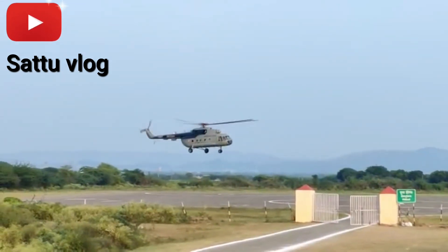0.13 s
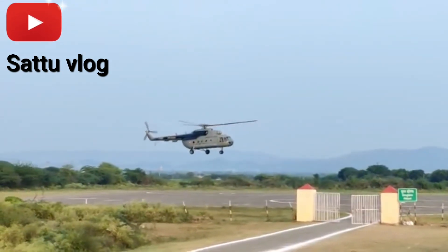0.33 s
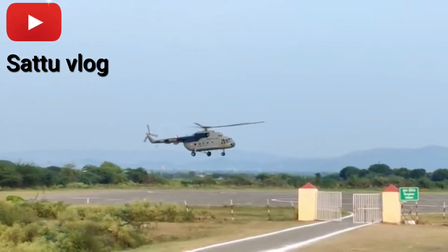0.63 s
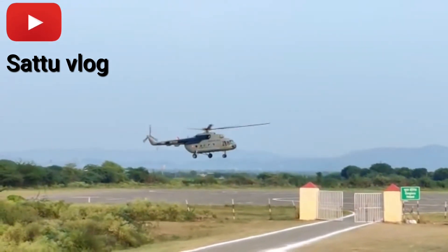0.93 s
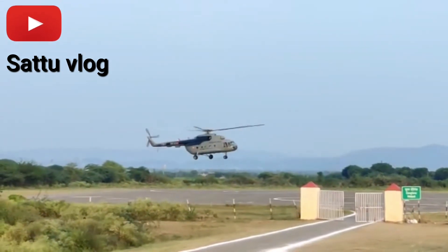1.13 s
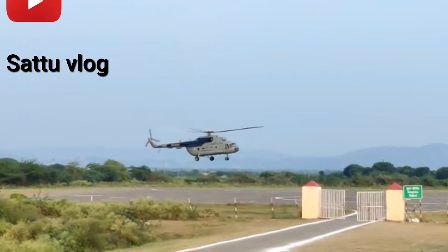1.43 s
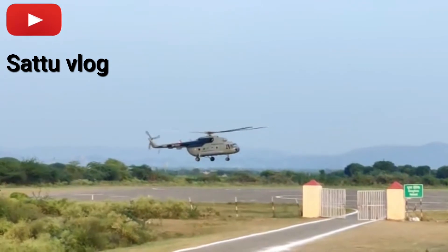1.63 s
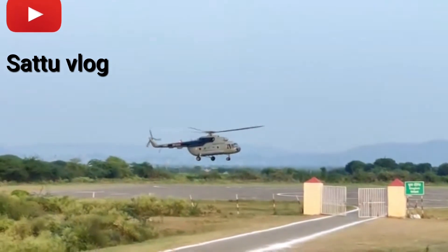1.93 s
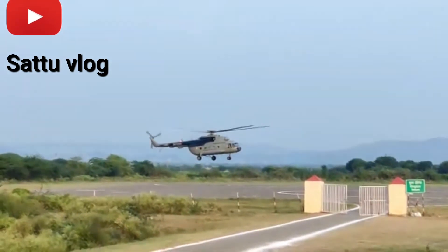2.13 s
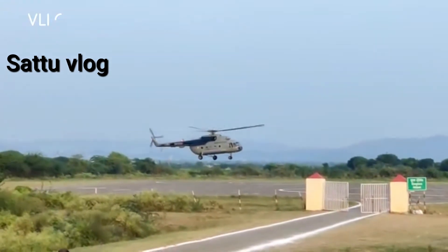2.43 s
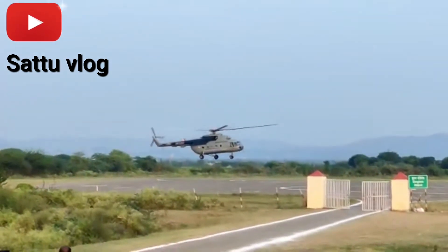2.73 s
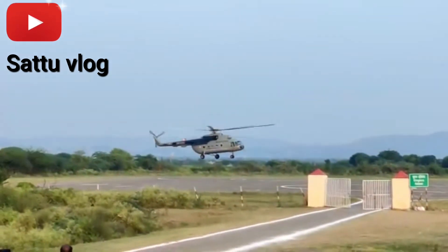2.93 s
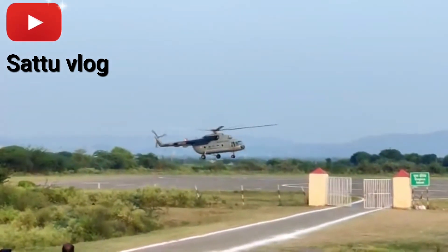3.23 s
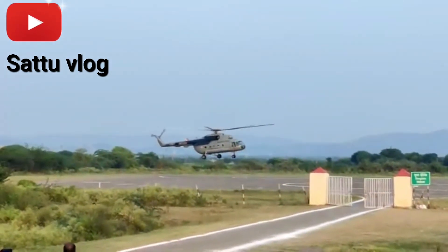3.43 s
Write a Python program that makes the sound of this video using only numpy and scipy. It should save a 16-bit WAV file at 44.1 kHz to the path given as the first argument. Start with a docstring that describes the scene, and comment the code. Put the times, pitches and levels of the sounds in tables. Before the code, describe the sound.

A helicopter hovers low, its steady rotor roar and turbine hiss broken by rapid blade slaps.

```python
"""Hovering helicopter in wind

Rotor roar and turbine hiss are shaped random noise. Every blade pass adds a thump built of harmonics and a
noise swish; listed moments slap (short cosine bursts on a pressure dip) or crackle (bright noise bursts).
The tail rotor drones in harmonics, and a gearbox gives a sine whine with a narrow rasp. Two microphone ports
hear it with a lean, a lag and a ground echo; wind noise buffets them and the loudest peaks clip."""
import sys
import numpy as np
from scipy import signal
from scipy.fft import rfft, irfft, next_fast_len
from scipy.io import wavfile
from scipy.ndimage import uniform_filter1d, map_coordinates

SR = 44100
rng = np.random.default_rng(int(sys.argv[2]) if len(sys.argv) > 2 else 0)


def ratio_of_db(decibels):
    """Turn decibels (scalar or array-like) into linear amplitude factors; 0 dB maps to 1."""
    return 10 ** (np.asarray(decibels, float) / 20)


def persist_wave(psi):
    """Save psi, clipped to +-1, as 16-bit WAV."""
    counts = np.round(np.clip(psi, -1, 1) * 32767).astype(np.int16)
    wavfile.write(sys.argv[1], SR, np.atleast_2d(counts).T)


N = 158760

BLADE_HZ, BLADE_S = 16.015, 2.2155  # main rotor passes a second, moment of one pass


def unit(x):
    """Normalization: scales a signal to an rms of 1."""
    return x / np.sqrt(np.mean(x ** 2) + 1e-20)


def along(points, hz):
    """Logarithmic frequency scale: interpolates (Hz, value) points."""
    f, v = np.transpose(points)
    return np.interp(np.log(hz + 1), np.log(f + 1), v)


def curves(rows):
    """Linear interpolation in time: one curve for each column after the seconds."""
    s, *cols = np.transpose(rows)
    return [np.interp(np.arange(N) / SR, s, c) for c in cols]


def wobble(rate):
    """Slow random modulation: a smooth curve through random knots, rate of them a second."""
    knots = rng.standard_normal(int(N * rate / SR) + 4)
    return map_coordinates(knots, [np.arange(N) * rate / SR])


def filtered(x, response):
    """Linear filtering: multiplies the spectrum by a complex response of frequency."""
    m = next_fast_len(N + SR // 2)
    return irfft(rfft(x, m) * response(np.fft.rfftfreq(m, 1 / SR)), m)[..., :N]


def rush(spectrum, alike, patchy_db):
    """Turbulence noise: stereo of rms 1, with random gain patches in time and frequency."""
    z = signal.stft(rng.standard_normal((2, N)), nperseg=512)[2]
    field = rng.standard_normal(z.shape[1:])
    field = uniform_filter1d(uniform_filter1d(field, 6, 0), 7, 1)
    pair = signal.istft(z * ratio_of_db(patchy_db * unit(field)), nperseg=512)[1][:, :N]

    def mid_side(hz):
        angle = np.arccos(np.clip(along(alike, hz), -1, 1)) / 2  # splits power by left-right likeness
        return ratio_of_db(along(spectrum, hz)) * [np.cos(angle), np.sin(angle)]

    mid, side = filtered(pair, mid_side)
    return unit(np.array([mid + side, mid - side]))


def passes():
    """Rotor phase: main rotor blade passes counted along time."""
    return (np.arange(N) / SR - BLADE_S) * BLADE_HZ


def gate(late, sharp):
    """Periodic amplitude modulation: a swell of rms 1, once a blade pass."""
    return unit(np.exp(sharp * np.cos(2 * np.pi * (passes() - late))))


# Wind buffeting. Each row: time in seconds, level in dB.
WIND_LEVELS = [(0, -6.5), (.5, -10.5), (1.3, -11), (2, -11.5), (2.6, -12.5), (3.6, -13)]
# Spectrum of the buffeting. Each row: frequency in Hz, relative density in dB.
BUFFET_SPECTRUM = [(4, -38), (10, -5), (40, 0.5), (80, -6), (170, -11), (260, -36), (440, -120)]
WIND_ALIKE, WIND_LEAN_DB = 0.34, 7  # left-right likeness, left over right


def wind():
    """Turbulent pressure at the ports: lumpy low noise, mostly different at each, stronger on the left."""
    wind_db, = curves(WIND_LEVELS)
    lean_db = [[WIND_LEAN_DB / 2], [-WIND_LEAN_DB / 2]]
    lumps = ratio_of_db(0.8 * np.array([wobble(9.1), wobble(24.4)]) + lean_db)
    return ratio_of_db(wind_db) * lumps * rush(BUFFET_SPECTRUM, [(30, WIND_ALIKE)], patchy_db=1.44)


# Gearbox levels. Each row: time in seconds, whine peak in dB, rms of the rasp around it in dB.
GEAR_LEVELS = [(0, -32, -48), (.65, -37, -28.5), (1.05, -40, -42), (1.2, -31, -32), (1.9, -29.5, -34),
               (2.5, -33, -24.5), (2.9, -26, -28), (3.6, -25, -29)]
GEAR_HZ = 1873
RASP_HZ, RASP_WIDE_HZ = 1887, 81  # centre, half width at half amplitude
RASP_LATE, RASP_SHARP = 0.21, 1.1  # share of a pass after its moment; how peaked the swell is


def gearbox():
    """Gear-mesh excitation: a sine whine in a narrow noise rasp that swells with each blade pass."""
    whine_db, rasp_db = curves(GEAR_LEVELS)
    phase = 2 * np.pi * GEAR_HZ * np.arange(N) / SR + .3 * wobble(14)
    whine = np.sin(phase) * ratio_of_db(whine_db + .9 * wobble(9))
    noise = rng.standard_normal(N)
    rasp = unit(filtered(noise, lambda hz: 1 / (1 + ((hz - RASP_HZ) / RASP_WIDE_HZ) ** 4)))
    return whine + ratio_of_db(rasp_db) * gate(RASP_LATE, RASP_SHARP) * rasp


# Tail rotor harmonics. Each row: multiple of the tail blade rate, rms level in dB.
TAIL_HARMONICS = [(1, -24), (2, -23), (3, -26), (4, -33), (5, -36)]
TAIL_HZ = 56.36  # tail blade passes a second


def tail_rotor():
    """Harmonic radiation of a rotor: multiples of the tail blade rate, each wavering."""
    turn = 2 * np.pi * TAIL_HZ * np.arange(N) / SR
    return sum(np.sqrt(2) * ratio_of_db(db + 2.0 * wobble(3.1)) * np.sin(k * turn + .35 * wobble(2.41))
               for k, db in TAIL_HARMONICS)


# Coherence of the aircraft noise at the ports. Each row: frequency in Hz, left-right likeness (1 is equal).
LIKENESS = [(120, 1), (250, 0.92), (560, 0.33), (780, 0.74), (1130, 0.064), (1300, 0.24), (1560, 0.99),
            (1880, 0.59), (2600, 0.067), (3500, 0.13), (5600, 0.13), (12000, 0.11)]
# Rotor and engine noise. Each row: time in seconds, then levels in dB of the rotor roar, wake, blade tips,
# low exhaust, high exhaust, turbine hiss and top of the hiss.
ROAR_LEVELS = [(0, -14.5, -15.5, -18, -20, -17.5, -18, -31.5),
               (.25, -16.5, -16.5, -21, -22.5, -20.5, -21, -33.5),
               (.55, -15, -18, -21.5, -23.5, -22.5, -21, -34),
               (.9, -15.5, -23.5, -25.5, -24, -23.5, -22, -36.5),
               (1.2, -15, -27.5, -21.5, -24.5, -23, -20.5, -37.5),
               (1.5, -16, -22, -27.5, -24, -23, -22.5, -38),
               (1.75, -14.5, -23, -22, -20.5, -20.5, -20, -36),
               (2.05, -15.5, -23.5, -20.5, -22, -21, -20.5, -34),
               (2.4, -15.5, -20.5, -23, -21.5, -20.5, -19.5, -37.5),
               (2.8, -16, -20, -23.5, -23, -20.5, -18, -36), (3.2, -13, -24.5, -23.5, -24.5, -19, -18, -33),
               (3.6, -12, -25.5, -25.5, -24.5, -19.5, -16.5, -35)]
# Spectra of these seven bands in that order. Each row: frequency in Hz, relative density in dB.
ROAR_SPECTRUM = [(47, -8), (80, -5), (145, -1.5), (177, -3.5), (370, -8), (480, -15.5), (810, -120)]
WAKE_SPECTRUM = [(210, -67), (350, -2), (460, 6), (620, -2.5), (810, -35), (1360, -120)]
TIP_SPECTRUM = [(400, -37), (600, -10), (700, 1.5), (800, 0.5), (920, 0), (1050, -18.5), (1400, -40),
                (2300, -120)]
LOW_EXHAUST_SPECTRUM = [(560, -14), (1110, -6.5), (1420, -7), (1700, -11.5), (2210, -64), (3740, -120)]
HIGH_EXHAUST_SPECTRUM = [(970, -15), (1650, -11.5), (1890, -4.5), (2110, -7), (2350, -6), (2750, -7.5),
                         (2970, -11.5), (3450, -8), (4600, -18), (5980, -25), (10100, -120)]
HISS_SPECTRUM = [(2530, -28), (4300, -6), (4780, -6.5), (5930, -0.5), (6510, -5.5), (7300, -24),
                 (12000, -120)]
TOP_SPECTRUM = [(4100, -50), (7000, -15), (7500, 2), (10900, -2.5), (11800, 1), (13000, -14.5), (15800, -9),
                (17000, -120)]
# Patchiness. A single row: rms gain variation in dB of each band in that order; patches deepen toward the treble.
BAND_PATCHY_DB = (1.2, 1.2, 1.2, 1.4, 1.6, 1.9, 3.2)
FLUTTER_DB = .75  # depth of each of two wobbles: one shared by the bands, one of each band's own


def roar():
    """Broadband aerodynamic noise: wake, tips, exhaust and turbine, fluttering in turbulent air."""
    air = wobble(10.06)
    spectra = (ROAR_SPECTRUM, WAKE_SPECTRUM, TIP_SPECTRUM, LOW_EXHAUST_SPECTRUM,
               HIGH_EXHAUST_SPECTRUM, HISS_SPECTRUM, TOP_SPECTRUM)
    total = 0
    for db, spectrum, patchy_db in zip(curves(ROAR_LEVELS), spectra, BAND_PATCHY_DB):
        gain = ratio_of_db(db + FLUTTER_DB * (air + wobble(12)))
        total = total + gain * rush(spectrum, LIKENESS, patchy_db)
    return total


# Crackling blade passes. Each row: time in seconds, rms at the peak in dB.
CRACKLE_BURSTS = [(.622, -20.5), (.685, -20), (.812, -19), (.875, -24), (.99, -23), (1.058, -18),
                  (1.245, -28), (1.68, -25), (2.175, -29)]
# Spectrum of the crackle. Each row: frequency in Hz, relative density in dB.
CRACKLE_SPECTRUM = [(600, -60), (1100, -14), (1600, -3), (2300, 2.5), (3200, -9.5), (6000, -120)]
CRACKLE_S = 0.0084  # half width of a burst


def crackles():
    """Impulsive broadband noise: short bright bursts on some blade passes."""
    t = np.arange(N) / SR
    bursts = sum(ratio_of_db(db) * np.exp(-.5 * ((t - s) / CRACKLE_S) ** 2) for s, db in CRACKLE_BURSTS)
    return bursts * rush(CRACKLE_SPECTRUM, LIKENESS, patchy_db=2.5)


# Blade loading noise. Each row: time in seconds, swish level in dB, thump level in dB.
LOADING_LEVELS = [(0, -25, -19), (.4, -23.5, -18.5), (.8, -28.5, -23.5), (1.1, -26, -21), (1.5, -22.5, -23),
                  (1.75, -21.5, -22.5), (2.05, -27.5, -16.5), (2.9, -32, -14), (3.6, -25.5, -20.5)]
# Harmonics of the thump. Each row: multiple of the blade rate, relative level in dB.
THUMP_HARMONICS = [(11, 0), (12, 0), (13, -1), (14, -3), (15, -4), (16, 1), (17, -6), (18, -6), (19, -2),
                   (22, -4), (23, -10), (28, -7), (30, -9)]
# Spectrum of the swish. Each row: frequency in Hz, relative density in dB.
SWISH_SPECTRUM = [(250, -120), (450, -15), (650, 7), (950, 1), (1500, -19), (3000, -120)]
SWISH_LATE, SWISH_SHARP = 0.44, 1.5  # share of a pass after its moment; how peaked the swell is
BEAT_DB, BEAT_RAD = -22, 1.4  # fundamental of the blade rate: mean rms level and lead


def main_rotor():
    """Blade loading noise: a suction thump of harmonics, a slow beat and a swish at each pass."""
    swish_db, thump_db = curves(LOADING_LEVELS)
    turn = 2 * np.pi * passes()
    thump = unit(sum(-ratio_of_db(db + 2.5 * wobble(3)) * np.cos(k * turn + .75 * wobble(2.5))
                     for k, db in THUMP_HARMONICS))
    beat_gain = np.sqrt(2) * ratio_of_db(BEAT_DB + 0.84 * wobble(2.1))
    beat = beat_gain * np.cos(turn + BEAT_RAD + 0.45 * wobble(1.26))
    swell = gate(SWISH_LATE + .04 * wobble(3), SWISH_SHARP)
    swish = ratio_of_db(swish_db + 1.3 * wobble(12)) * swell * rush(SWISH_SPECTRUM, LIKENESS, patchy_db=2.4)
    return ratio_of_db(thump_db) * thump + beat + swish


# Blade slaps. Each row: onset in seconds, peak of the oscillation in dB, pitch in Hz.
SLAP_EVENTS = [(0.812, -5, 670), (0.936, -7, 820), (1.238, -12, 740), (1.555, -8, 711), (1.676, -6, 770),
               (1.737, -9, 800), (1.83, -7, 759), (2.076, -5, 845), (2.213, -1.5, 850), (2.277, -8, 912),
               (2.338, -5, 720), (2.401, -4.5, 750), (2.462, -0.5, 830), (2.526, -2, 726), (2.588, -5, 740),
               (2.651, -1, 765), (2.711, 1, 740), (2.773, -5, 734), (2.839, -2.5, 760), (2.9, -5, 780)]
SLAP_S, SLAP_PEAK_S = 0.0013, 0.00219  # half width; time from onset to peak
SUCK_DB, SUCK_S = -6.5, 0.0021  # pressure dip under a slap: level over it, half width


def slaps():
    """Blade-vortex interaction: cutting a tip vortex gives a few cycles riding on a dip of pressure."""
    t = np.arange(N) / SR - SLAP_PEAK_S
    total = 0
    for s, db, hz in SLAP_EVENTS:
        cycles = np.cos(2 * np.pi * hz * (t - s)) * np.exp(-.5 * ((t - s) / SLAP_S) ** 2)
        dip = ratio_of_db(SUCK_DB) * np.exp(-.5 * ((t - s) / SUCK_S) ** 2)
        total = total - ratio_of_db(db) * (cycles + dip)
    return total


# Lean of the aircraft sound. Each row: frequency in Hz, left over right in dB.
PORT_LEAN = [(60, 14.5), (99, -6), (160, 5), (270, 1), (450, 1), (740, 2.5), (2010, -1.5), (3330, -2),
             (5500, 4), (9080, -3.5), (15000, 4.5)]
DIP_HZ, DIP_WIDE_HZ, DIP_DB = 1638, 59.6, 3.5  # the band thinned by the ground echo
LAG_S = 0.00011  # right port hears later


def scene():
    """Interference and arrival differences: two ports hear the aircraft, and wind is added at them."""
    craft = roar() + main_rotor() + slaps() + crackles() + tail_rotor() + gearbox()
    side = np.array([[.5], [-.5]])  # left, right

    def ports(hz):
        echo_db = DIP_DB * np.exp(-.5 * ((hz - DIP_HZ) / DIP_WIDE_HZ) ** 2)
        lag = np.exp(2j * np.pi * side * hz * LAG_S)
        return ratio_of_db(side * along(PORT_LEAN, hz) - echo_db) * lag

    return filtered(craft, ports) + wind()


def roll_off(x):
    """The treble ends steeply here."""
    return signal.sosfilt(signal.butter(12, 15990, fs=SR, output="sos"), x)


CLIP_TOP, CLIP_HARD = 1.0, 6  # ceiling in full scale, sharpness of the knee
MIC_TOP_HZ = 12500  # 3 dB down here


def record(dry):
    """Saturation and band limiting: the input stage clips the loudest peaks and rolls off the top."""
    clipped = dry / (1 + np.abs(dry / CLIP_TOP) ** CLIP_HARD) ** (1 / CLIP_HARD)
    rolled = filtered(clipped, lambda hz: (hz > 2) / np.sqrt(1 + (hz / MIC_TOP_HZ) ** 8))
    return roll_off(rolled)


dry = scene()
out = record(dry)
persist_wave(out)
```